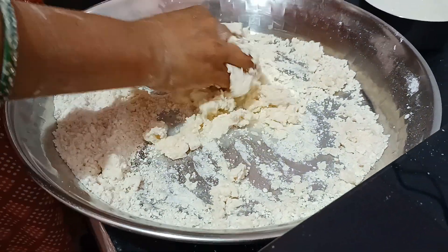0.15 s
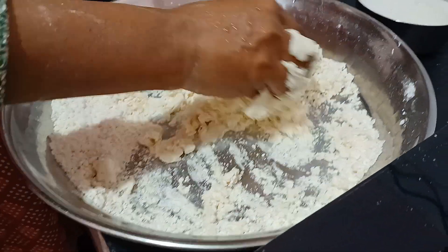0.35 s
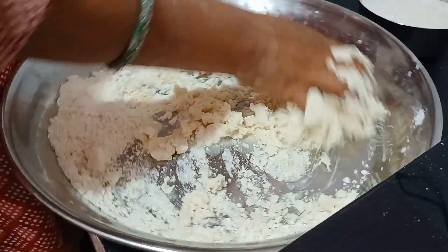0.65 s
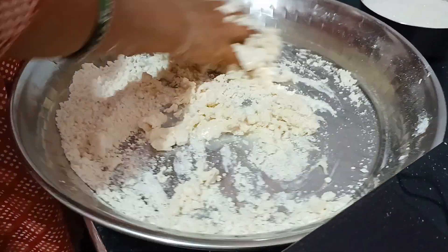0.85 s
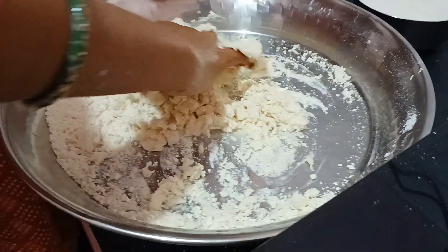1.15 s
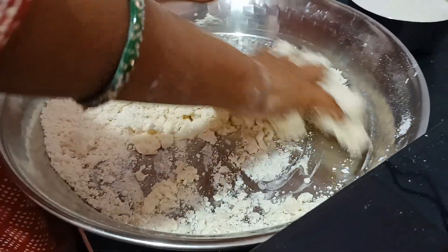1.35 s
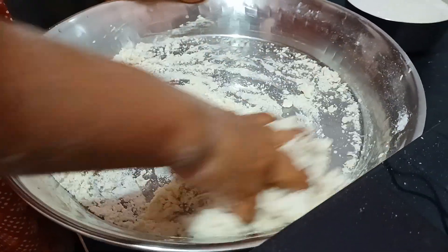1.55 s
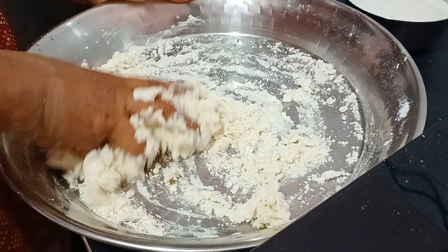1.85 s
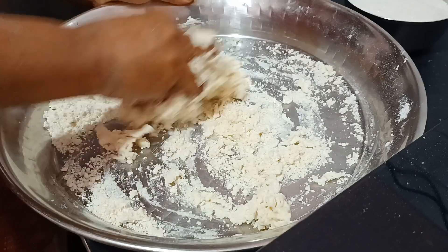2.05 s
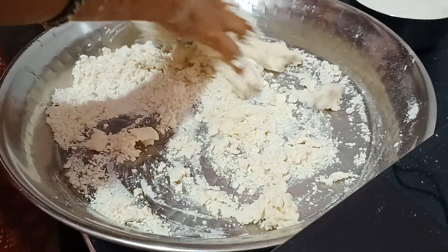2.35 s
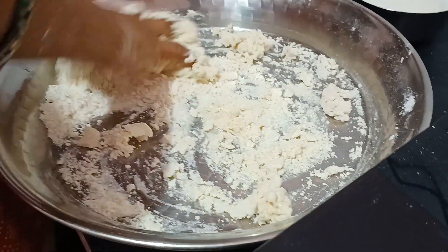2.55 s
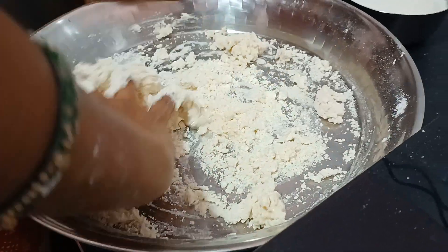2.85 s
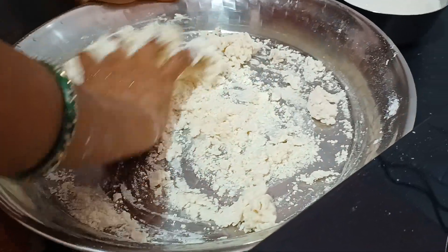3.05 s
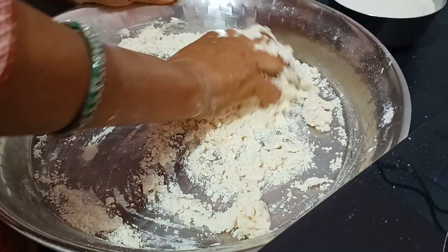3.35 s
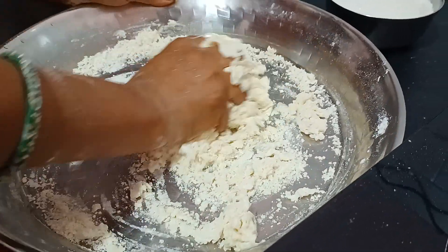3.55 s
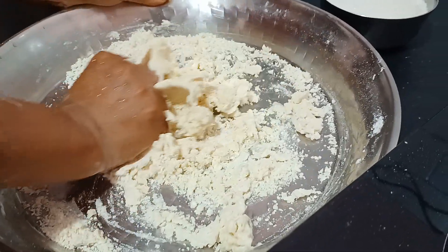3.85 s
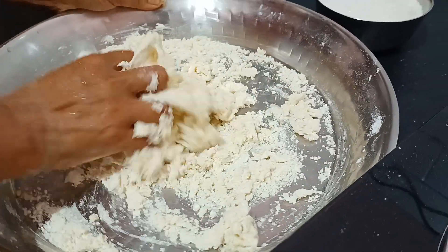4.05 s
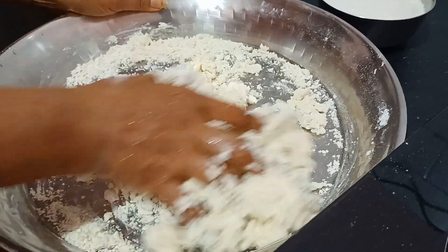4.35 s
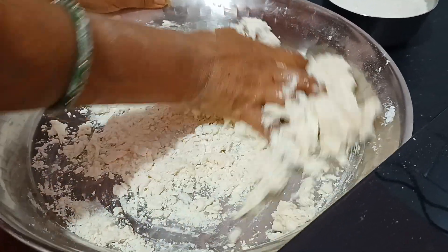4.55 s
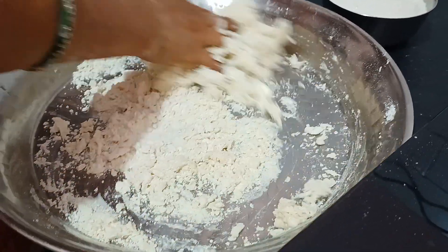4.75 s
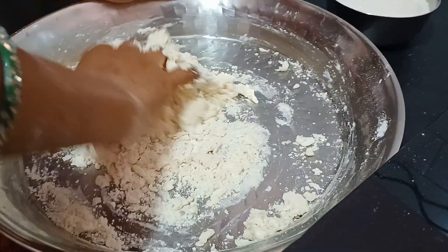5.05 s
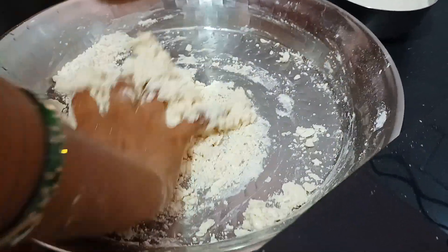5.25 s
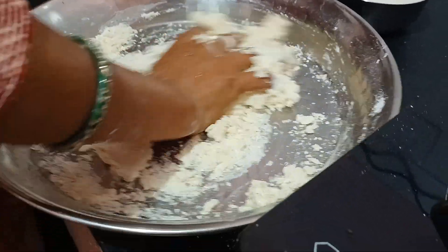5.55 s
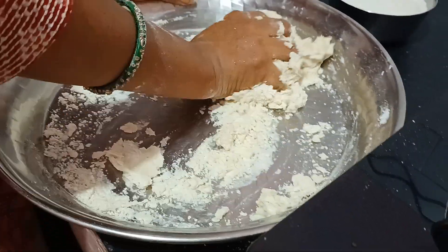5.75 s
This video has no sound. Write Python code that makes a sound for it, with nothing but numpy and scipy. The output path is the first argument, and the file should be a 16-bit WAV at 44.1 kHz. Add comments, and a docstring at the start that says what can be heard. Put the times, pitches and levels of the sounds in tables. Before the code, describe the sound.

Close stereo pickup in a small kitchen. A bangle clinks on the rim at once, then a hand sweeps crumbly dough over a steel plate in uneven scraping, rustling strokes. The plate drops and rattles at about half a second, judders lightly later, and after a quieter middle rocks loudest near five seconds. Strokes continue to the end over faint low room rumble.

```python
"""A hand sweeps and squeezes crumbly flour and fat around a wide steel plate, close by in a small kitchen.
Each stroke is filtered noise and tiny random slips: a rustle, a scrape, a powder hiss and a rumble.
The plate knocks, rocks, judders and is thumped through the dough: ringing modes plus short noise bursts.
A bangle's clink is a few fading sine tones, and small ticks are snaps of noise.
The room is low noise with a wavering bass."""
import sys
import numpy as np
from scipy import signal
from scipy.fft import rfft, irfft
from scipy.io import wavfile
from scipy.ndimage import uniform_filter1d

SR = 44100
rng = np.random.default_rng(int(sys.argv[2]) if len(sys.argv) > 2 else 0)


def persist_wave(psi):
    """Save psi, clipped to +-1, as 16-bit WAV."""
    counts = np.round(np.clip(psi, -1, 1) * 32767).astype(np.int16)
    wavfile.write(sys.argv[1], SR, np.atleast_2d(counts).T)


N = 260577  # length in samples
TIME = np.arange(N) / SR  # s

# strokes of the hand: full speed at t/s, rise/s, hold/s, rustle level/dB before the layer trim,
# then relative to that level: scrape/dB, powder hiss/dB, rumble/dB
HAND_STROKES = [(0.053, 0.14, 0.18, -45.5, 1, -12, -1), (0.32, 0.17, 0.34, -57.5, -30, -14, -14),
                (0.562, 0.061, 0.079, -38, 2.5, -26, -18), (0.702, 0.18, 0.29, -37, -1.5, -6, -13.5),
                (1.303, 0.12, 0.098, -44, 1, -5, -29), (1.439, 0.17, .3, -39.5, 2, -11.5, -7.5),
                (1.88, 0.29, 0.14, -45.5, -2.5, -5.5, -18), (2.21, 0.094, 0.071, -59.5, -1, 0, -16),
                (2.315, 0.026, 0.014, -47.5, -4, -7, -9), (2.422, .1, 0.067, -44, -4.5, -5, -13),
                (2.6, .12, 0.074, -52.5, -6, -6, -19), (2.958, 0.077, 0.019, -57.5, -2, -1, -1),
                (3.038, 0.072, .03, -42.5, -4.5, -1, -9.5), (3.118, 0.079, 0.11, -40.5, -6, -6.5, -24),
                (3.34, 0.22, 0.18, -40.5, 0, -7.5, -17.5), (3.68, 0.19, 0.39, -57.5, -2, -10, -2.5),
                (4.037, 0.033, 0.0089, -51.5, 1, 1, -11), (4.323, .2, .1, -58.5, -3, -8, -16),
                (4.492, 0.25, 0.08, -48, -8, -5, -3.5), (4.71, 0.29, 0, -40, -3.5, -6, -15),
                (4.844, 0.24, 0.16, -34.5, -5.5, -5.5, -20), (5.114, 0.08, 0.22, -48.5, 0, -12, 1),
                (5.271, 0.043, 0.12, -39.5, -5.5, -6.5, -2.5), (5.646, 0.43, 0.062, -38.5, -1, -7.5, -13),
                (5.847, 0.28, .1, -46, -3.5, -7.5, -11)]
# single knocks of the plate: t/s, favoured pitch f/Hz (set by the place of the blow),
# thud level/dB, boom level/dB, clang level/dB (boom and clang before small trims)
PLATE_KNOCKS = [(0.001, 654, -39.5, -36.5, -34.5), (0.124, 136, -33.5, -54, -36),
                (0.523, 460, -66, -34, -38.5), (1.007, 210, -49, -74, -44.5), (1.444, 417, -57, -36, -32.5),
                (2.304, 220, -57, -73, -44), (2.442, 400, -47, -50.5, -43),
                (2.475, 520, -44.5, -49.5, -44.5), (3.625, 700, -60, -65, -53), (4.319, 306, -41, -38, -57),
                (4.359, 494, -48, -44, -55.5), (4.98, 340, -36, -30.5, -27), (5.269, 817, -49, -44, -31.5)]
# small sharp ticks of the bangle and of hard crumbs: t/s, level/dB before the trim
SHARP_TICKS = [(1.851, -36.5), (2.306, -37.5), (3.994, -45), (4.018, -29.5), (4.028, -50), (4.132, -48)]
# ringing modes of the loaded plate: f/Hz, relative level/dB, time to fall by 60 dB/s
PLATE_MODES = [(77, -7.5, 0.26), (134.1, -1, 0.34), (217.7, -5, 0.13), (256.3, 2.5, 0.22), (308, 0, 0.42),
               (355, -8, 0.35), (435, -5.5, 0.19), (532.4, -7, 0.26), (598, -13.5, 0.33), (770, -2, 0.28),
               (833, 6, 0.088), (935, 0, 0.39), (1038, -0.5, 0.5), (1117, 2.5, 0.31), (1295, -8, 0.52),
               (1354, 16.5, 0.11), (1394, 2.5, 0.35), (1510, 0, 0.36), (1665, 4, 0.42), (1784, 0.5, 0.18)]
# tones of the bangle that has just struck the rim: f/Hz, level/dB, time to fall by 60 dB/s
BANGLE_TONES = [(353, -38.5, 0.19), (680, -32, 0.29), (1230, -34.5, 0.35), (1683, -35.5, 0.54),
                (2610, -61, 0.4), (3403, -26.5, 0.22), (3456, -36.5, 0.54), (6480, -29.5, 0.18)]
# the plate drops back and rocks: t/s, first gap/s, each gap over the last, number of blows, pitch f/Hz,
# thud level/dB, boom level/dB, clang level/dB, clang lost per blow/dB
PLATE_ROCKING = [(0.551, .051, .84, 3, 292, -23, -25, -22, 11.5),
                 (4.961, .0805, .705, 4, 277, -28, -20.5, -16.5, 6)]
# the palm thumps the dough: t/s, thud level/dB
PALM_THUMPS = [(3.234, -49), (4.075, -53)]

# tone colours, each: f/Hz, level/dB
# crumbs slipping on steel
RUSTLE_COLOUR = [(500, -15), (1200, -17), (2050, -0.5), (2600, 1), (3300, -4), (4500, -3), (5500, -5.5),
                 (7200, -5), (8200, -27), (12000, -53)]
# hollow scrape of the plate
SCRAPE_COLOUR = [(300, -15.5), (650, -17.5), (850, -5.5), (1100, -4.5), (1320, 3), (1500, -3.5), (1700, 3),
                 (1950, -0.5), (2800, -20)]
# hiss of powder
POWDER_COLOUR = [(5000, -37), (7500, 8), (8700, 0.5), (10000, 4), (13000, -1.5), (16000, -3)]
# dough rolling under the palm
RUMBLE_COLOUR = [(60, -25), (130, -8.5), (190, -2.5), (280, -6), (420, -6), (650, -22), (1100, -37)]
# snap of a sharp tick
TICK_COLOUR = [(700, -14), (2200, -6.5), (3100, 4), (5000, 0), (7000, 4), (8500, -9), (11000, -2),
               (16000, -11)]
# air of the room
ROOM_COLOUR = [(20, -36), (40, -13.5), (60, -4), (80, 5.5), (105, -3), (135, -5.5), (180, -13.5),
               (300, -17), (600, -26.5), (900, -23.5), (1500, -37), (5000, -31), (16000, -34)]

TOP_HZ = 16000  # highest pitch the recorder keeps
# a stroke swells, slows as crumbs pile up, then lets go
RISE_DB, SAG_DB_PER_S, RELEASE_DB_PER_S = 25, 21.5, 103
# crumbs stirring between strokes, before the layer trims
REST_DB, REST_SCRAPE_DB, REST_POWDER_DB, REST_RUMBLE_DB = -64.5, -72, -87, -65
CONTACT_TICK_DB = -6  # treble tick of a single knock, relative to its clang
BOUNCE_LOSS_DB = 4  # thud and boom lost per rocking blow
# the plate judders as it is pushed along the counter
JUDDER_S, JUDDER_GAP_S, JUDDER_HZ = 1.367, .037, 408
JUDDER_THUD_DB, JUDDER_BOOM_DB, JUDDER_CLANG_DB = -55, -39.5, -42
# the dough cushions boom and clang, given relative to the thud
THUMP_HZ, THUMP_BOOM_DB, THUMP_CLANG_DB = 193, -15, -30


def undb(db):
    """Turn decibels into a plain gain."""
    return 10 ** (np.asarray(db) / 20)


def unit(x):
    """Scale to an average (rms) level of 1."""
    return x / np.sqrt(np.mean(x ** 2))


def colour(x, points):
    """Filter x to a drawn spectrum, with no sound ahead of its cause (minimum phase)."""
    hz, db = np.transpose(points)
    size = 4096
    f = np.maximum(np.fft.rfftfreq(size, 1 / SR), 1)
    level_db = np.interp(np.log(f), np.log(hz), db)
    # folding the cepstrum forward in time gives the minimum-phase filter
    cepstrum = irfft(np.log(undb(level_db)))
    cepstrum[1:size // 2] *= 2
    cepstrum[size // 2 + 1:] = 0
    response = irfft(np.exp(rfft(cepstrum)))
    return signal.fftconvolve(x, response[None], axes=1)[:, :x.shape[1]]


def band(x, lo_hz, hi_hz, order=3):
    """Keep only the pitches between two limits."""
    limits = [lo_hz, min(hi_hz, SR / 2 - 1)]
    return signal.sosfilt(signal.butter(order, limits, "band", fs=SR, output="sos"), x)


def fade(t, t60):
    """Die away by 60 dB in t60 seconds."""
    return np.exp(-np.log(1000) * t / t60)


def pan(db):
    """Gains that make the first channel louder than the second by db."""
    return undb(np.array([[db], [-db]]) / 2)


def noise(count, split_hz):
    """Noise at two microphones: alike in the bass, unrelated above split_hz."""
    mid, side = rng.standard_normal((2, count))
    side = signal.sosfilt(signal.butter(1, split_hz, "high", fs=SR, output="sos"), side)
    return np.array([mid + side, mid - side])


def walk(rate):
    """Smooth random drift with an rms near 1, redrawn rate times a second."""
    k = int(SR / rate)
    steps = np.repeat(rng.standard_normal(N // k + 1), k)
    return unit(uniform_filter1d(steps, k)[:N])


def add(out, s, x):
    """Mix x into out from time s."""
    i = max(int(s * SR), 0)
    out[:, i:i + x.shape[1]] += x[:, :N - i]


def blow(x, db):
    """Set the rms level of the first 30 ms of a hit."""
    count = int(.03 * SR)
    return x * undb(db) / np.sqrt(np.mean(x[:, :count] ** 2))


def kitchen():
    """Low room noise whose bass wavers slowly under a steady faint hiss."""
    air = unit(colour(noise(N, 110), ROOM_COLOUR))
    bass = signal.sosfiltfilt(signal.butter(2, 220, fs=SR, output="sos"), air)
    hiss = air - bass
    return (bass * undb(3.0 * walk(16)) + hiss) * undb(-49.5) * pan(2.1)


def effort():
    """Gains of rustle, scrape, powder and rumble: each stroke rises, sags and releases over a resting level."""
    power = undb([[REST_DB], [REST_SCRAPE_DB], [REST_POWDER_DB], [REST_RUMBLE_DB]]) ** 2
    for s, rise, hold, db, scrape_db, powder_db, rumble_db in HAND_STROKES:
        t = TIME - s
        swell = RISE_DB * (np.maximum(-t, 0) / max(rise, .005)) ** 1.24
        decline = SAG_DB_PER_S * np.maximum(t, 0) + RELEASE_DB_PER_S * np.maximum(t - hold, 0)
        gain = undb(db - np.minimum(swell + decline, 100))
        layers = undb([[0], [scrape_db], [powder_db], [rumble_db]])
        power = power + (layers * gain) ** 2
    return np.sqrt(power)


def crumbs(scatter_db, tail_db, per_s):
    """Dense tiny slips of very unequal size, each smeared by the walls of the plate."""
    size_db = scatter_db * np.minimum(rng.exponential(size=N), 6)
    size = undb(size_db) * rng.choice([-1, 1], N)
    slips = size * (rng.random(N) < per_s / SR)
    t = TIME[:SR // 20]
    paths = undb(tail_db) * rng.standard_normal((2, len(t))) * fade(t, 0.049)
    # direct sound, five samples later at the second microphone
    paths[0, 0] += 1
    paths[1, 5] += 1
    return unit(signal.fftconvolve(slips[None], paths, axes=1)[:, :N])


def wander(x, depth_db, rate):
    """The moving hand damps and frees different modes, so each narrow band swells and sinks alone."""
    f, s, cells = signal.stft(x, SR, nperseg=1024)
    drift = uniform_filter1d(rng.standard_normal(cells.shape), size=3, axis=1)
    drift = unit(uniform_filter1d(drift, max(int(1 / (rate * s[1])), 1), axis=2))
    depth = depth_db / (1 + f[:, None] / 5000)  # high modes overlap and even out
    return signal.istft(cells * undb(depth * drift), SR)[1][:, :N]


def rubbing(rustle_gain, scrape_gain, powder_gain):
    """Crumbs slip between palm and steel: a bright rustle, a hollow scrape of the plate and a powder hiss."""
    grip_db = 0.99 * walk(40)  # the hand catches and slides
    slips = crumbs(scatter_db=3.1, tail_db=-23, per_s=4500)
    grains = wander(unit(slips + undb(5.0) * noise(N, 370)), depth_db=4.5, rate=6)
    # the gains in dB trim each layer
    rustle = unit(colour(grains, RUSTLE_COLOUR)) * pan(-2.6) * undb(3.0)
    scrape = unit(colour(grains, SCRAPE_COLOUR)) * pan(3.3) * undb(0.02)
    powder = unit(colour(grains, POWDER_COLOUR)) * pan(1.3) * undb(-1.0)
    mix = rustle * rustle_gain + scrape * scrape_gain + powder * powder_gain
    return mix * undb(grip_db)


def pressing(gain):
    """The dough rolls under the palm and rumbles unevenly through the plate."""
    rumble = unit(colour(noise(N, 680), RUMBLE_COLOUR))
    return rumble * gain * undb(2.7 * walk(14) - 2)


def bangle():
    """One clink on the rim rings as fading sines; later ticks of bangle and crumbs are dry with a short echo."""
    out, t = np.zeros((2, N)), TIME[:SR // 2]
    for hz, db, t60 in BANGLE_TONES:
        phase = rng.uniform(0, 2 * np.pi) + np.array([[0], [1.2]])
        tone = undb(db) * fade(t, t60) * np.sin(2 * np.pi * hz * t + phase)
        add(out, 0, tone * pan(-3.5))
    for s, db in SHARP_TICKS:
        snap = noise(len(t), 800) * (fade(t, 0.0041) + undb(-21) * fade(t, 0.27))
        add(out, s, blow(colour(snap, TICK_COLOUR), db - 5.5) * pan(2.0))
    return out


def knock(place_hz, thud_db, boom_db, clang_db, tick_db):
    """One blow on the plate: a crack at the contact, the ring of its modes and a diffuse kitchen tail."""
    t = TIME[:int(SR * .7)]
    hz, db, t60 = np.transpose(PLATE_MODES)[:, :, None]
    chance = rng.standard_normal((4, len(PLATE_MODES), 1))
    # 0 is hard, 1 is cushioned: the more the boom outweighs the clang, the weaker the noisy tail
    softness = np.clip((boom_db - clang_db) / 20, 0, 1)

    # the place of the blow picks out some modes; high ones reach the two microphones in different phases
    favour_db = 6 * np.exp(-(np.log2(hz / place_hz) / 0.17) ** 2)
    size = undb(db + favour_db + 1.4 * chance[2]) * fade(t, t60)
    phase = 2 * np.pi * hz * (1 + 0.0029 * chance[0]) * t + np.pi * chance[1]
    shift = chance[3] * (hz / 1000) ** 1.37
    modes = np.array([np.sum(size * np.sin(phase + side * shift), axis=0) for side in (1, -1)])
    tail = noise(len(t), 520) * fade(t, 0.42)
    ring = blow(modes, 0) + blow(tail, 2.1 - 12 * softness)

    body = ring * (1 - np.exp(-t / 0.00081))  # slow bending waves arrive after the crack
    thud = blow(band(body, 57, 196), thud_db)
    boom_band = band(body, 0.66 * place_hz, 740 - 170 * softness, order=4)
    boom = blow(boom_band, boom_db + .5) * pan(0.61)

    contact = np.sin(2 * np.pi * 1330 * t + np.array([[0], [1.6]])) * fade(t, 0.002)
    clang_ring = band(ring, 870, 1690, order=4) * fade(t, 1.0)
    clang = blow(clang_ring, 0) + blow(band(contact, 900, 1930), -1.5)
    clang = blow(clang, clang_db + 0.062) * pan(1.2)

    tick_shape = fade(t, 0.022) + undb(-11.5) * fade(t, 0.42)
    tick = band(noise(len(t), 800), 1800, 4100, order=2) * tick_shape
    return thud + boom + clang + blow(tick, tick_db)


def knocks():
    """Single blows as the plate tips under the hand."""
    out = np.zeros((2, N))
    for s, hz, thud_db, boom_db, clang_db in PLATE_KNOCKS:
        add(out, s, knock(hz, thud_db, boom_db, clang_db, clang_db + CONTACT_TICK_DB))
    return out


def rocking():
    """The tipped plate drops onto the counter and settles in ever quicker, duller blows."""
    out = np.zeros((2, N))
    for s, gap, ratio, count, hz, thud_db, boom_db, clang_db, dulling_db in PLATE_ROCKING:
        for k in range(round(count)):
            loss = k * BOUNCE_LOSS_DB
            clang = clang_db - k * dulling_db
            add(out, s, knock(hz, thud_db - loss, boom_db - loss, clang, clang + CONTACT_TICK_DB - 3))
            s = s + gap * ratio ** k
    return out


def judder(count=5):
    """The plate sticks and slips on the counter in a short uneven run of light blows."""
    out = np.zeros((2, N))
    for k in range(count):
        s = JUDDER_S + JUDDER_GAP_S * (k + .12 * rng.standard_normal())
        hit = knock(JUDDER_HZ, JUDDER_THUD_DB, JUDDER_BOOM_DB, JUDDER_CLANG_DB, JUDDER_CLANG_DB - 12)
        add(out, s, hit)
    return out


def thumps():
    """Soft blows of the palm through the dough, mostly thud."""
    out = np.zeros((2, N))
    for s, db in PALM_THUMPS:
        clang_db = db + THUMP_CLANG_DB
        add(out, s, knock(THUMP_HZ, db, db + THUMP_BOOM_DB, clang_db, tick_db=clang_db))
    return out


def scene():
    """Mix the hand, the plate, the bangle and the room."""
    rustle, scrape, powder, rumble = effort()
    hand = rubbing(rustle, scrape, powder) + pressing(rumble)
    plate = knocks() + rocking() + judder() + thumps()
    return hand + plate + bangle() + kitchen()


def record(dry):
    """The recorder clips at full scale and cuts the top."""
    low_pass = signal.ellip(10, .2, 70, TOP_HZ, fs=SR, output="sos")
    return signal.sosfilt(low_pass, np.clip(dry, -1, 1))


dry = scene()
out = record(dry)
persist_wave(out)
```